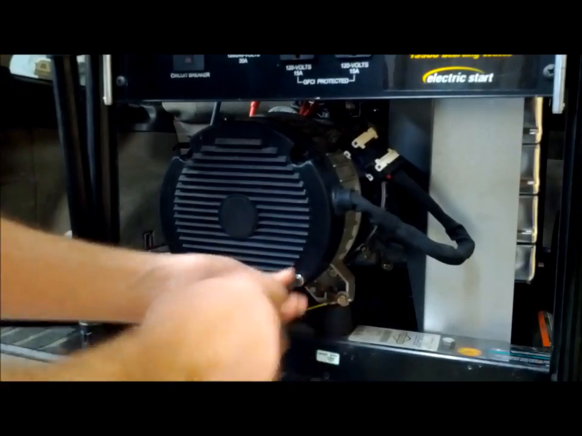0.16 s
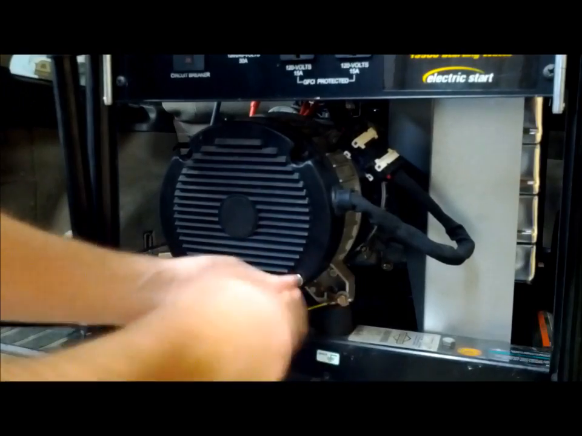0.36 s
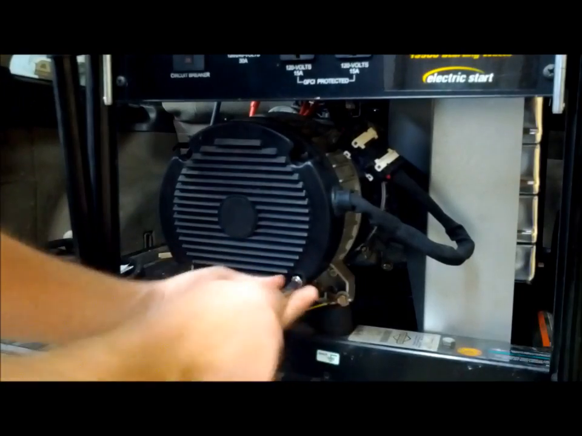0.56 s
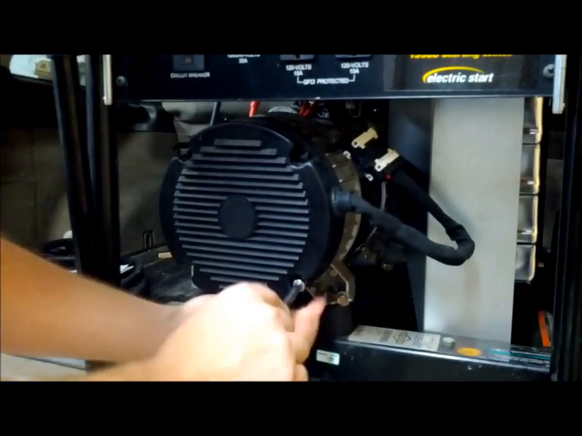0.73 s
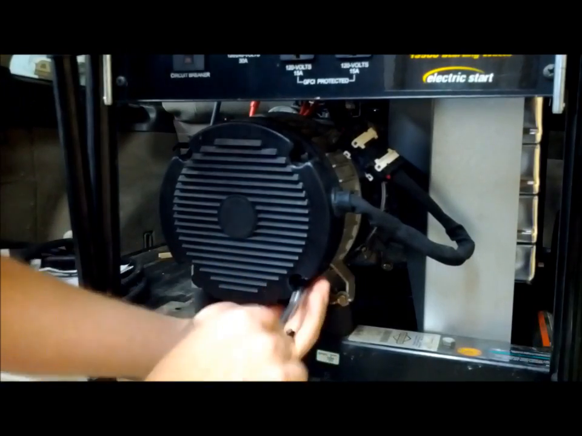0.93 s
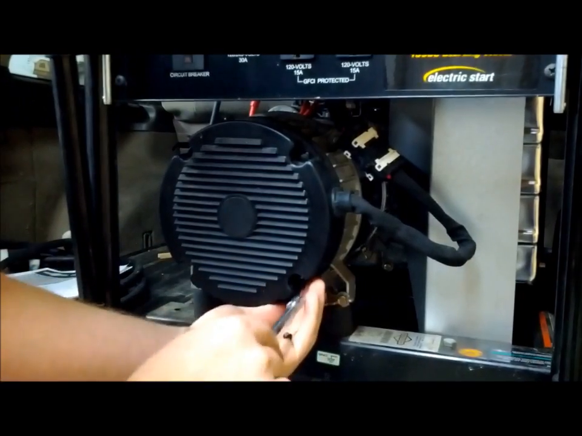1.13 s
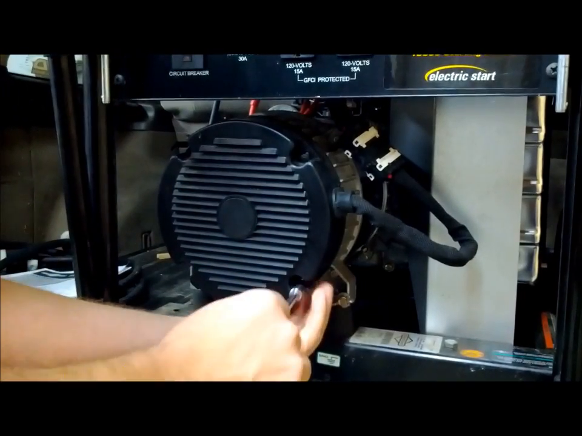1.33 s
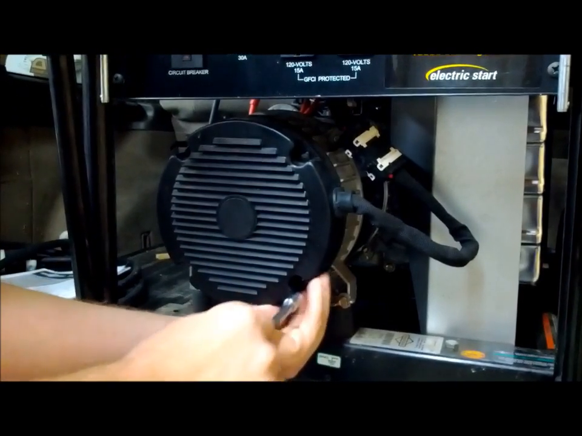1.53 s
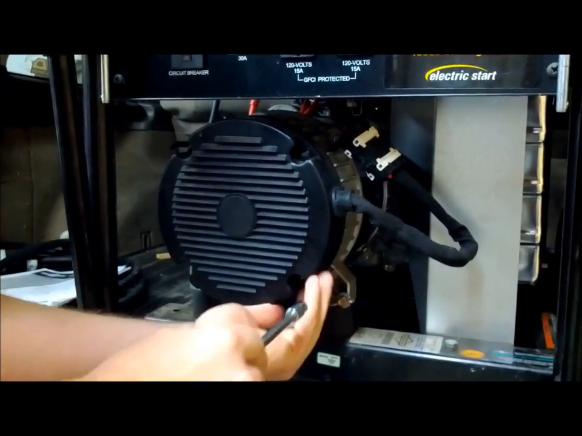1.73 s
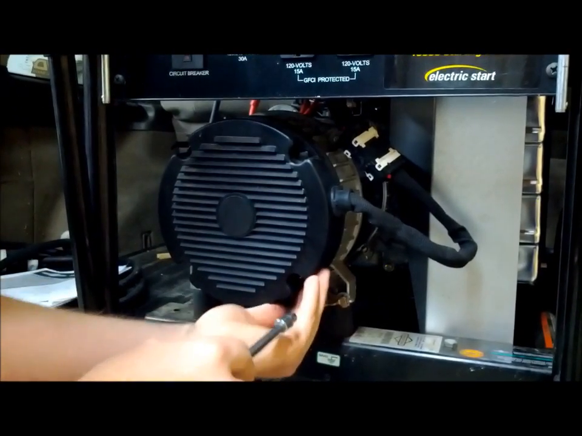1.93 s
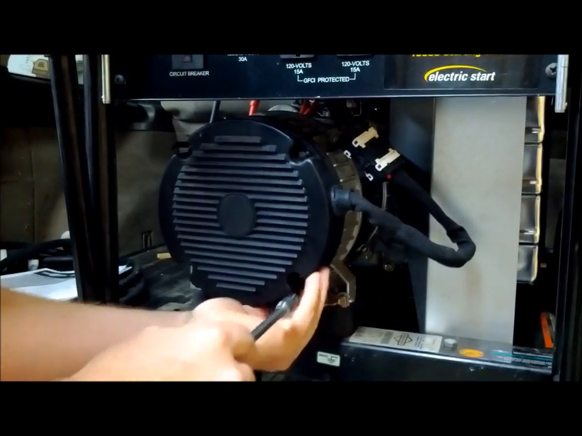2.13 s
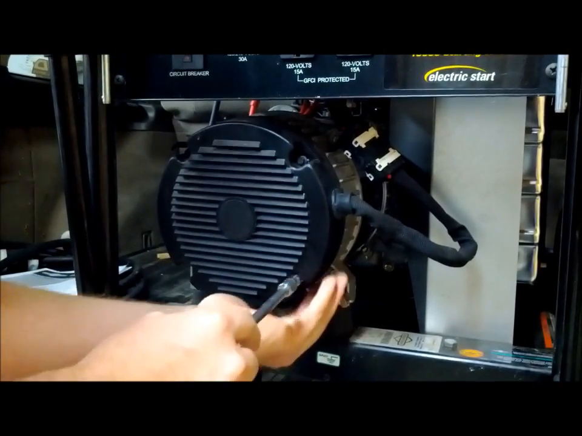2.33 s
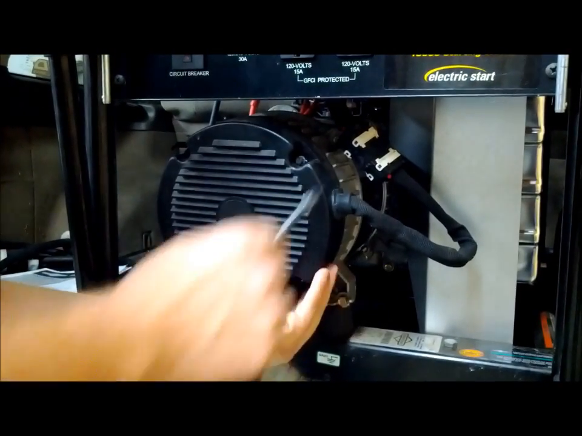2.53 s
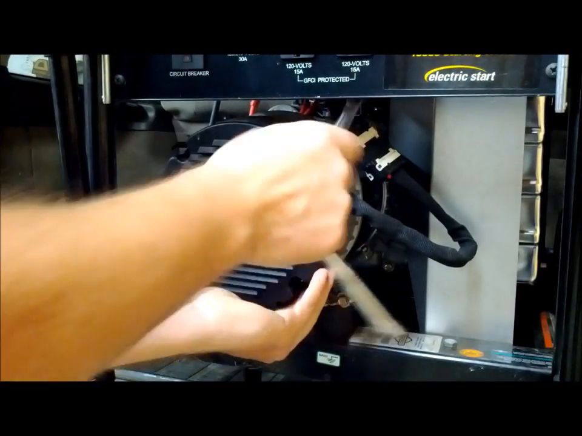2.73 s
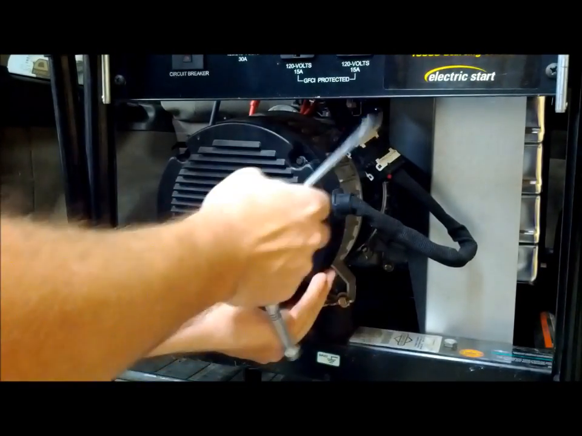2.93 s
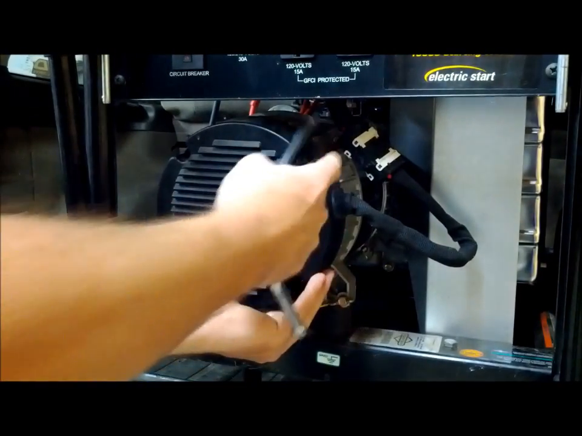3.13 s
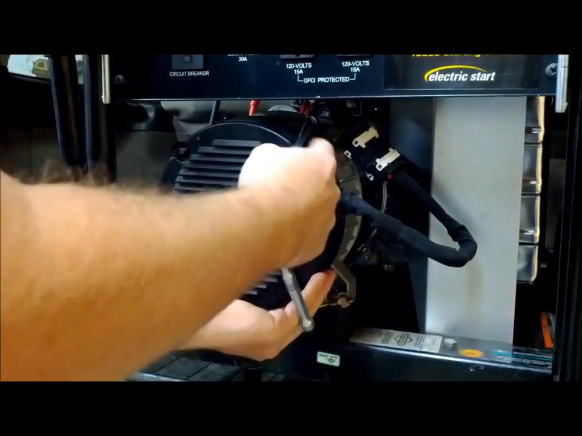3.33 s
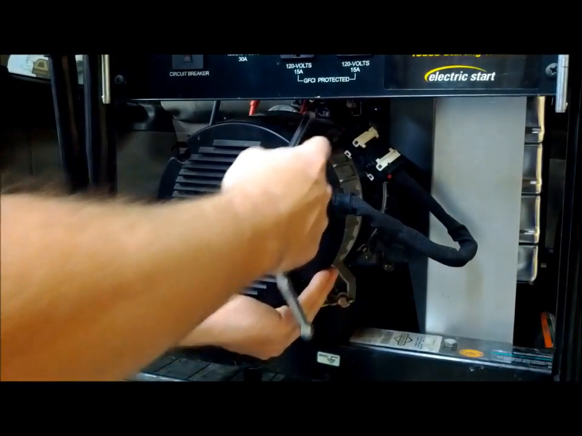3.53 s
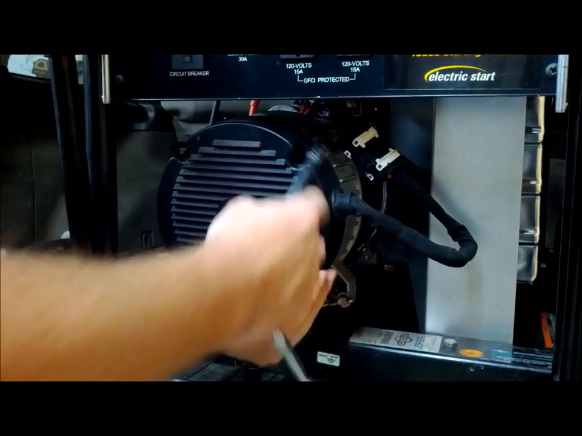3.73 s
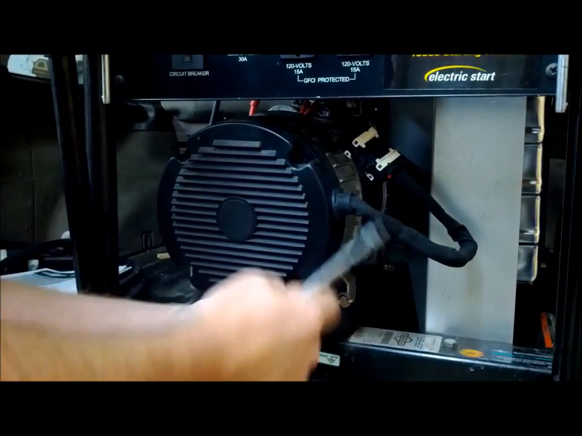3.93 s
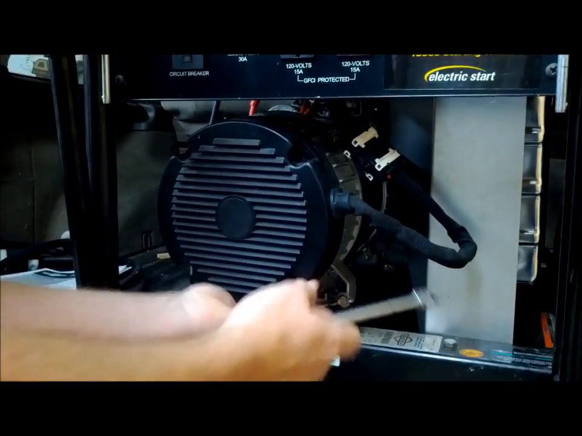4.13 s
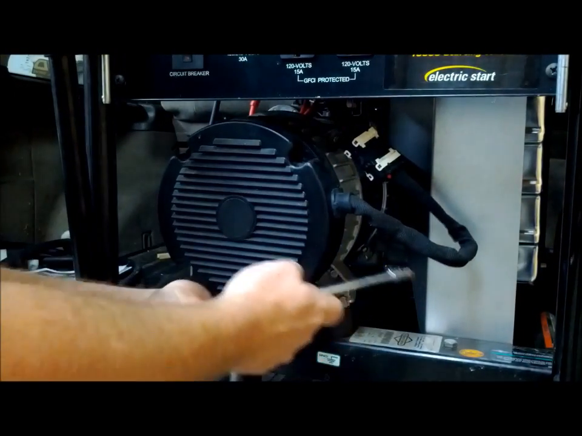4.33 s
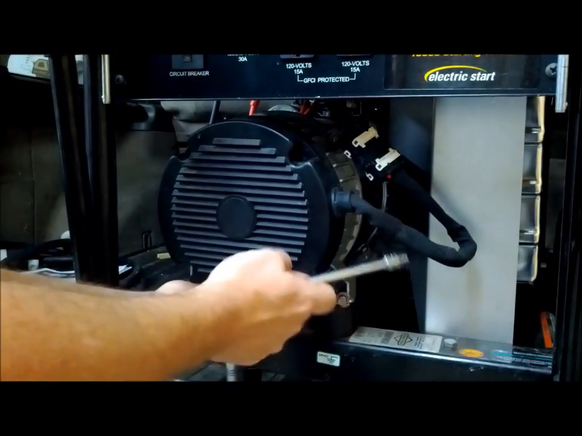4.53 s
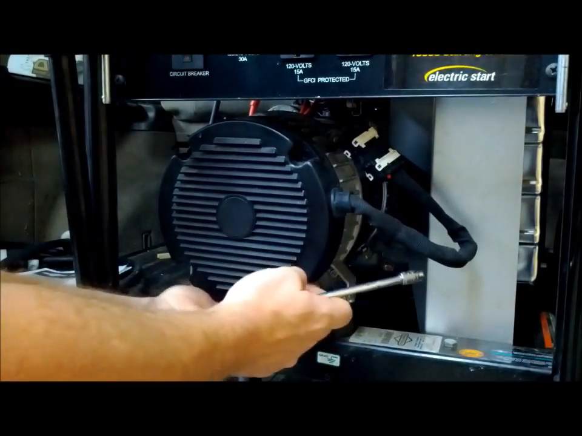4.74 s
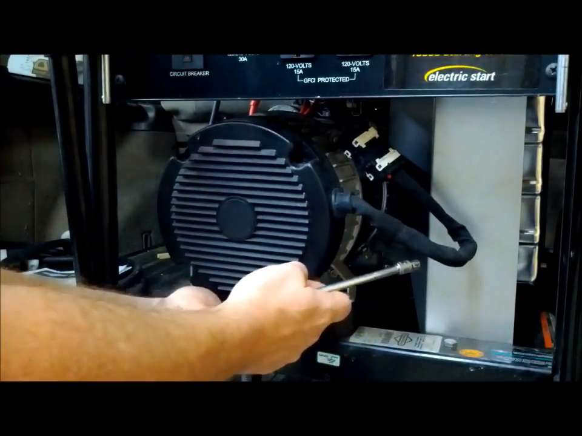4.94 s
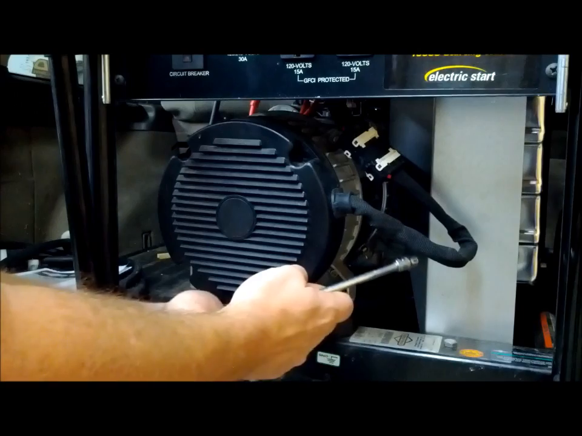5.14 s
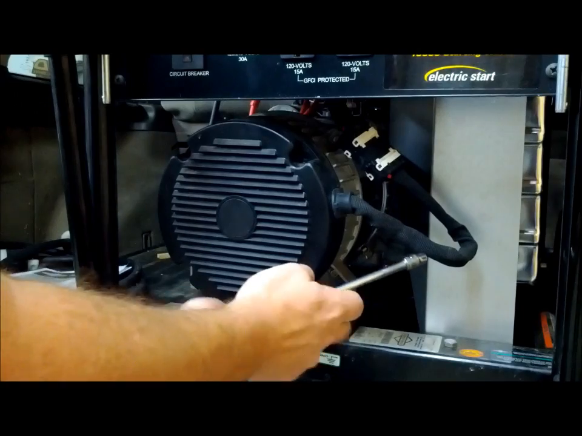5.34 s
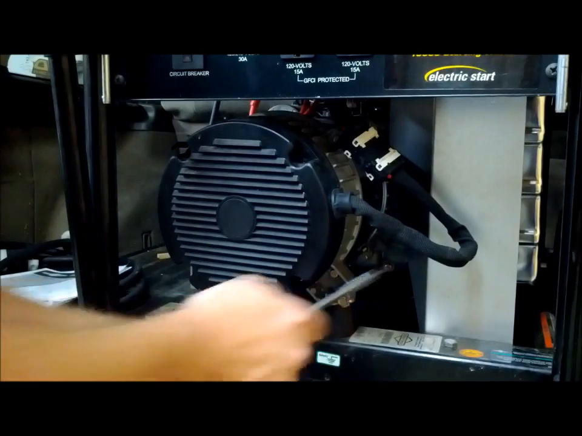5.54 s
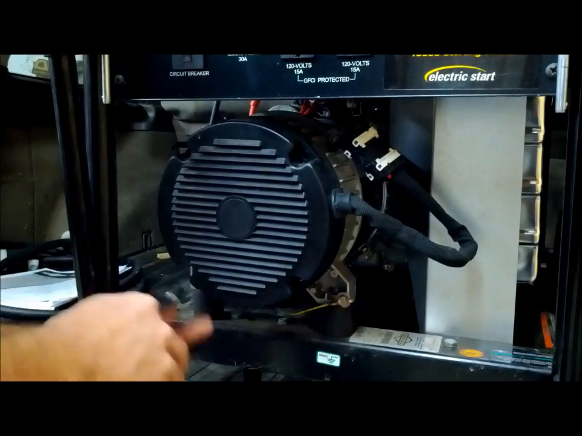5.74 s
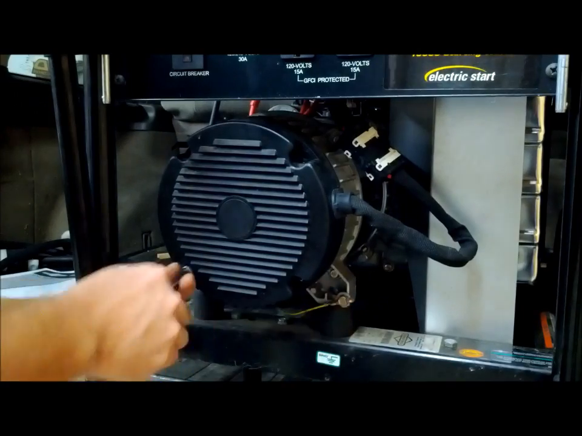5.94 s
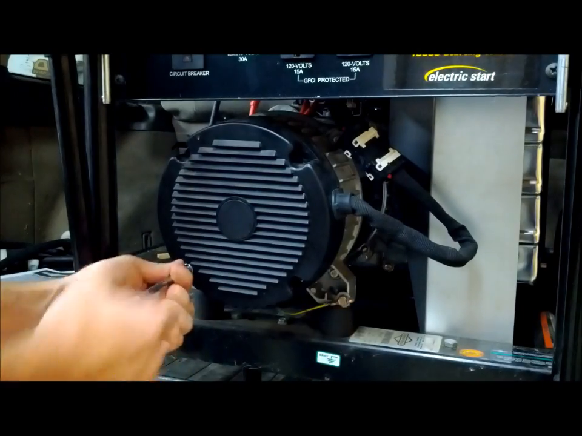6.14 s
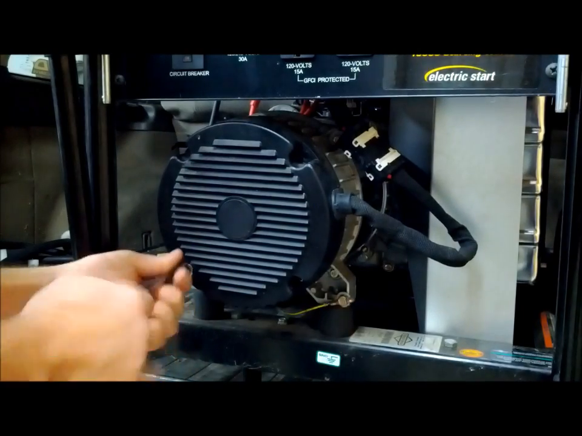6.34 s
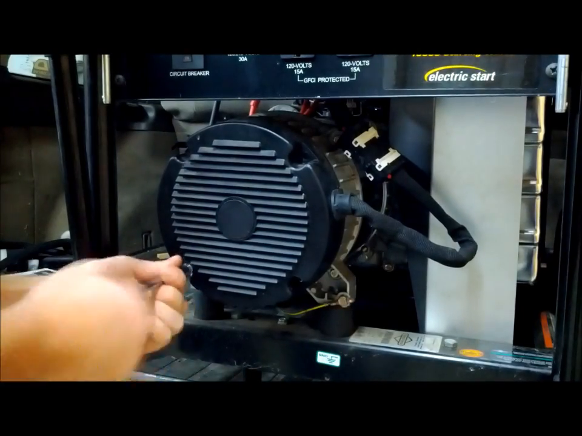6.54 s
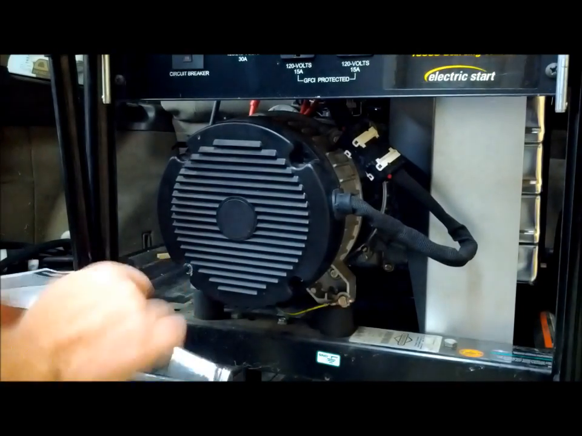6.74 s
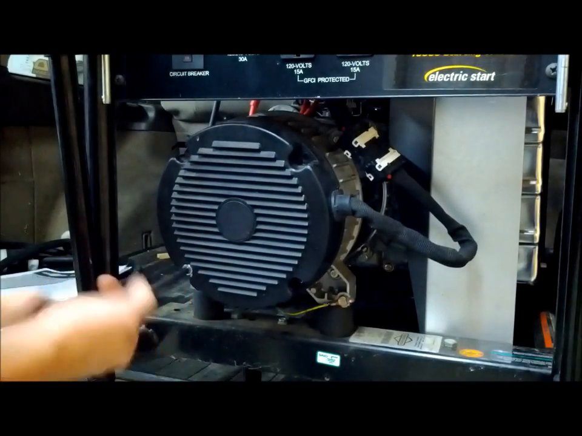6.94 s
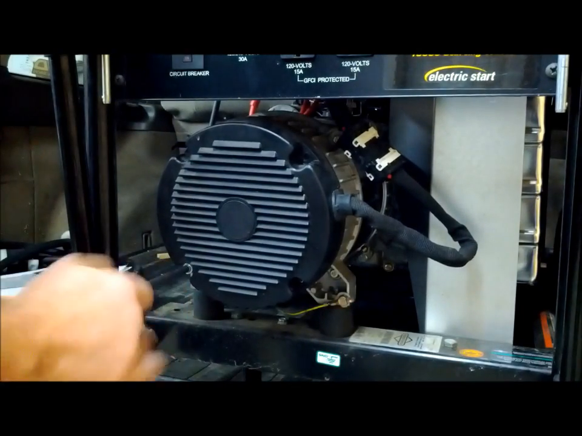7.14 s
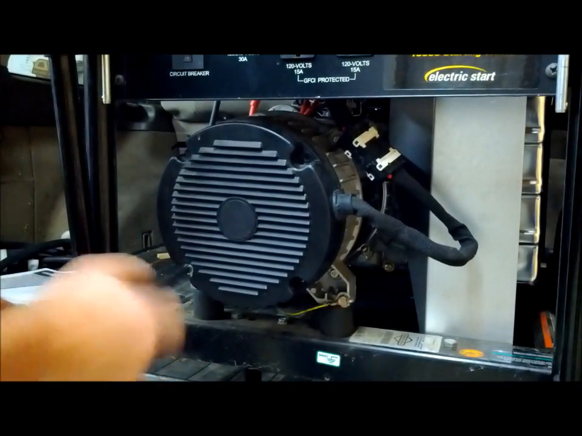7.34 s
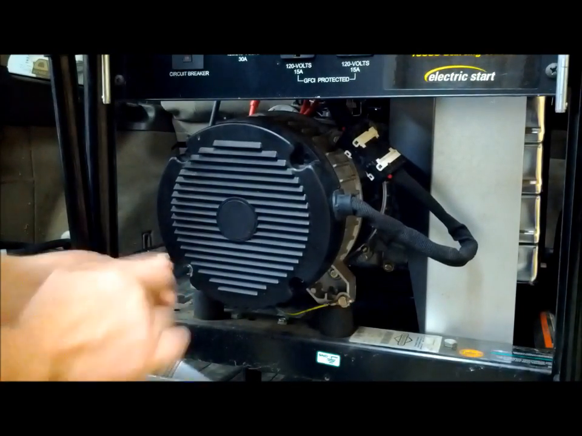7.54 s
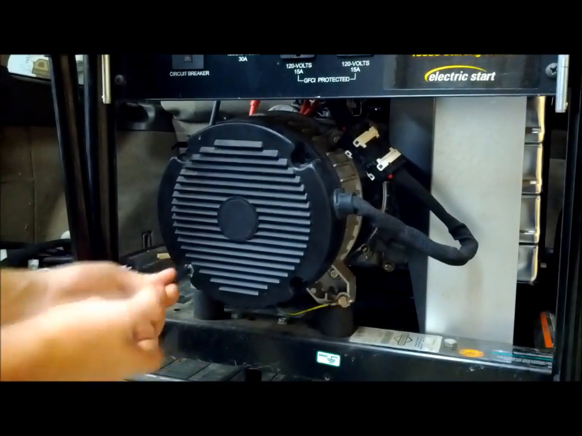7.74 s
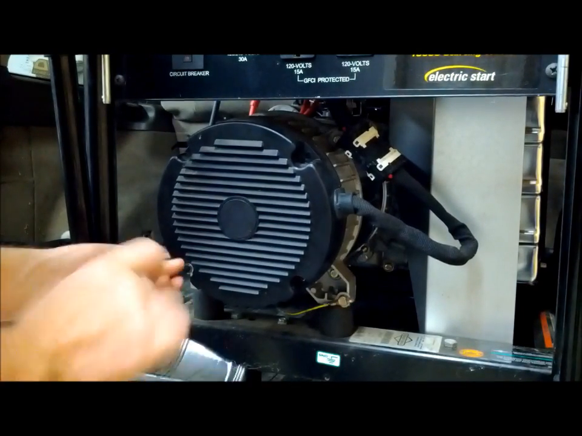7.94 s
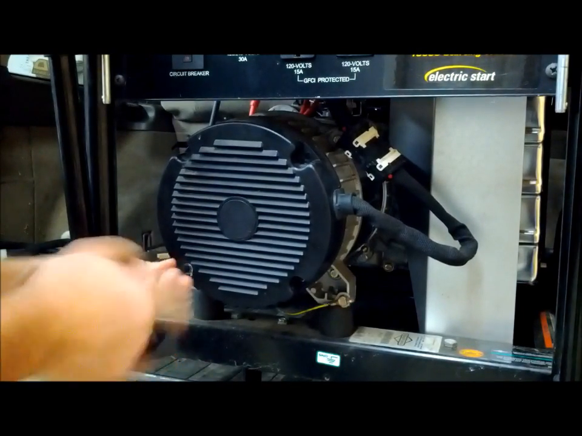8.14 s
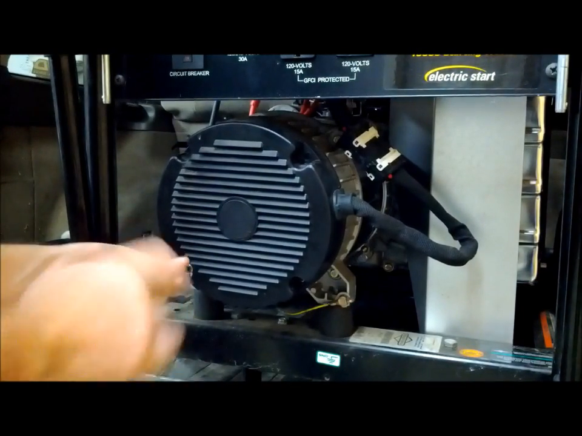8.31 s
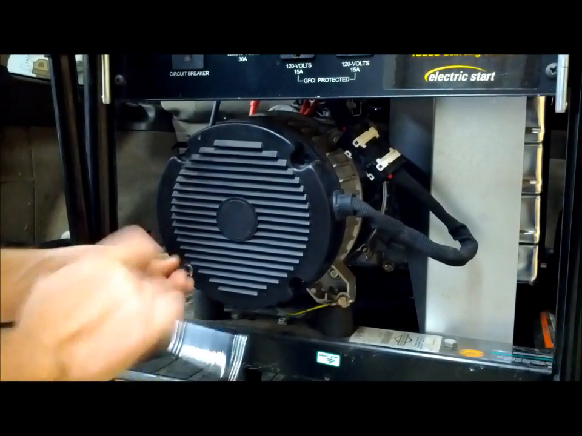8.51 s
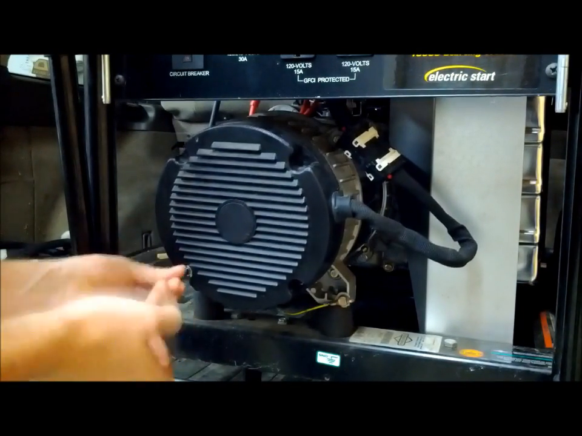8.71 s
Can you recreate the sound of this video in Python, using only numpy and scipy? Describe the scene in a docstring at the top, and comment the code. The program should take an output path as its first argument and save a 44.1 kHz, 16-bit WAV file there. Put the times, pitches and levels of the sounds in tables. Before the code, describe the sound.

A close, dry view of a steel hand tool in a quiet garage with low airy hum and a short diffuse tail. At 0 s a tiny bright click burst, then a fast ratchet run at 0.3-0.45 s. From 0.6 to 2.3 s small faint metal taps, with brighter ticks near 1.8 and 2.1 s and grainy skin rubs. At 2.75 s a loud hard double clank rings the metal frame with a low boom; another knock at 3.15 s, a short rub and clack around 3.4 s, a knock at 3.7 s. From 4.3 to 5.3 s woody-metallic clacks, strongest near 4.95 s. Sharp snap at 5.8 s, rattle at 5.9 s, single clicks at 6.1-6.2 s. Ratchet bursts at 6.5 and 6.9 s; a dull object bounces at 7.1-7.25 s; slower clicks at 7.3-7.4 s, then rapid bright runs at 7.6, 7.95, 8.3 and 8.6 s, with slight knocks between.

```python
"""Steel ratchet in a garage

A steel ratchet is handled close by: extension and socket knock as broadband contact noise and short notes,
skin rubs as granular friction noise, and a part set down on the floor bounces as damped modes.
The pawl skips over the gear teeth in quick runs, and each drop excites the modes of gear, head and pawl.
Hard walls add a short diffuse tail over a quiet hum of air."""
import sys
import numpy as np
from scipy import signal
from scipy.fft import rfft, irfft
from scipy.io import wavfile

SR = 44100
rng = np.random.default_rng(int(sys.argv[2]) if len(sys.argv) > 2 else 0)


def transcribe(signal):
    """Save signal, clipped to [-1, 1], as a 16-bit WAV file at the path in sys.argv[1]."""
    frames = np.atleast_2d(signal).T
    limited = np.clip(frames, -1, 1)
    pcm = np.round(limited * 32767).astype(np.int16)
    wavfile.write(sys.argv[1], SR, pcm)


N = 386757  # samples in the scene

# contact noise of hand-held parts, one row each for thud, clack, tick and sparkle;
# the two times are 1/e decays: low_hz, high_hz, crack_s, rattle_s
HELD_RANGES = [(188, 1300, 0.0025, 0.02), (1245, 3610, 0.0009, 0.0083), (4350, 12000, 0.00062, 0.0056),
               (7800, 13200, 0.00059, 0.0051)]


def undb(db):
    """Decibel definition: a level becomes an amplitude ratio."""
    return 10 ** (np.asarray(db) / 20)


def band(x, lo_hz, hi_hz, order=3):
    """Linear filtering: a Butterworth band-pass."""
    return signal.sosfilt(signal.butter(order, [lo_hz, min(hi_hz, .45 * SR)], "band", fs=SR, output="sos"), x)


def place(times, grains):
    """Superposition: one row of samples is added at each time."""
    out = np.zeros(N + grains.shape[1])
    for at, grain in zip((np.asarray(times) * SR).astype(int), grains):
        out[at:at + len(grain)] += grain
    return out[:N]


def ring(times, blow_db, modes, rise_s, detune, drift_cycles2_per_s, free=1, loose=1):
    """Modal synthesis: each blow excites damped sines of uneven strength, phase and tuning."""
    palm_from_s, palm_to_s, palm_t60_s = 2, 5.5, 0.093  # the palm on the head damps modes above 4 kHz
    covered = ((times > palm_from_s) & (times < palm_to_s))[:, None]
    out = 0
    for hz, t60, db in modes:
        t = np.arange(int(min(t60, 1) * SR)) / SR
        size, shift, turn = rng.standard_normal((len(times), 3)).T[:, :, None]
        # loose joints let the phase wander, which roughens the long rings
        steps = rng.standard_normal(SR)
        wander = np.cumsum(steps)[:len(t)] * np.sqrt(drift_cycles2_per_s / SR)
        # the grip detunes the well-damped modes most
        tuned_hz = hz * (1 + detune * shift / (1 + t60 / 0.01))
        wave = np.sin(2 * np.pi * (tuned_hz * t + loose * turn + wander))
        # only modes shorter than 0.1 s are cut short by the next blow
        open_t60 = t60 * (free if t60 < .1 else 1)
        decay = 1000 ** (-t / np.where(covered & (hz > 4000), min(t60, palm_t60_s), open_t60))
        onset = (1 - np.exp(-t / rise_s)) ** 2
        strength = undb(blow_db[:, None] + db + 2.3 * size)
        out = out + place(times, strength * onset * decay * wave)
    return out


def chatter(times, db, lo_hz, hi_hz, fall_s, after_s, after_db, rise_s):
    """Rough contact: band noise under a quick crack and a fainter rattle while the parts settle."""
    t = np.arange(SR // 10) / SR
    decay = np.exp(-t / fall_s) + undb(after_db) * np.exp(-t / after_s)
    shape = (1 - np.exp(-t / rise_s)) * decay
    noise = band(rng.standard_normal(N), lo_hz, hi_hz)
    level = place(times, undb(db)[:, None] * shape / shape.max(axis=-1, keepdims=True))
    return band(level * noise / noise.std(), lo_hz, hi_hz, order=1)


def air():
    """Stationary noise: room air and microphone hiss take a fixed spectrum and swell a little."""
    # spectrum of the air, relative amplitude: frequency_hz, level_db
    spectrum = [(12, -37), (20, -0.5), (81, -6.5), (119, -5.5), (162, -12.5), (344, -19.5), (568, -24),
                (653, -22), (751, -23.5), (817, -32), (1050, -28), (5290, -34), (7390, -28.5), (15700, -30)]
    mean_db = -57.5
    hz, db = np.transpose(spectrum)
    shape = undb(np.interp(np.log(np.fft.rfftfreq(N, 1 / SR) + 1), np.log(hz), db))
    hiss = irfft(rfft(rng.standard_normal(N)) * shape, N)
    swell = np.interp(np.arange(N), np.linspace(0, N, 30), rng.standard_normal(30))
    return hiss / hiss.std() * undb(mean_db + 1.2 * swell)


def garage(x):
    """Diffuse reverberation: dense reflections build up over milliseconds, then decay band by band."""
    # decay of the reflections, level relative: centre_hz, t60_s, level_db
    room_bands = [(239, 0.33, -29.5), (500, 0.68, -25), (987, 0.5, -22.5), (1890, 0.6, -23),
                  (3260, 0.62, -18), (5400, 0.4, -11.5), (9500, 0.2, -7.5), (14200, 0.27, -10)]
    t, tail = np.arange(SR) / SR, 0
    for hz, t60, db in room_bands:
        noise = band(rng.standard_normal(SR), hz / 1.6, hz * 1.5, order=2)
        part = noise * 1000 ** (-t / t60) * (1 - np.exp(-t / 0.0061))
        # unit energy, then weighted by the inverse root of the band's width
        tail = tail + undb(db) * part / np.linalg.norm(part) / np.sqrt(1.46 * hz / SR)
    return signal.oaconvolve(x, tail)[:N]


def rub():
    """Granular friction: skin slips in uneven grains, dull from the palm and bright from the knurling."""
    # fingers slide over the tool; the last row is the faint bright hiss after a landing:
    # start_s, firmest_s, end_s, dull_db, bright_db
    strokes = [(0.15, 0.2, 0.29, -59.5, -69.5), (0.535, 0.714, 0.95, -68.5, -73),
               (1.58, 1.595, 1.64, -59.5, -63), (1.643, 1.67, 1.68, -55.5, -50.5),
               (1.754, 1.774, 1.93, -48.5, -53), (1.991, 2.104, 2.18, -51, -55.5),
               (2.234, 2.26, 2.27, -48, -42), (3.391, 3.46, 3.45, -39, -41),
               (4.06, 4.184, 4.25, -61.5, -55), (4.283, 4.355, 4.43, -56, -57),
               (6.217, 6.233, 6.4, -57, -51), (6.707, 6.81, 7.3, -63, -63), (7.105, 7.113, 25, -75, -73)]
    ease_db = -12  # level at both ends of a row, relative to its firmest moment
    # loose parts rattle along: mean rate, level over the rub and its standard deviation
    rattle_per_s, rattle_db, rattle_scatter_db = 370, -0.5, 4.5
    t, dull, bright = np.arange(N) / SR, 0, 0
    for start, firm, end, dull_db, bright_db in strokes:
        fade = np.clip(np.minimum(t - start, end - t) / 0.015, 0, 1)
        touch = fade * undb(np.interp(t, [start, firm, end], [ease_db, 0, ease_db]))
        dull = dull + undb(dull_db) * touch
        bright = bright + undb(bright_db) * touch
    # a new slip strength every 128 samples
    slips = rng.exponential(size=N // 128 + 1).clip(0, 3)
    grain = undb(4 * np.repeat(slips, 128)[:N])
    noise = [band(grain * rng.standard_normal(N), lo, hi) for lo, hi in ((650, 3400), (5500, 18000))]
    out = sum(level * n / n.std() for level, n in zip((dull, bright), noise))
    # Poisson arrivals of the rattle
    s = np.cumsum(rng.exponential(size=4000)) / rattle_per_s
    inside = s < t[-1]
    chance = rng.standard_normal((4000, 2))[inside].T
    at = (s[inside] * SR).astype(int)
    # the dull rub drives the clack range, the bright rub the tick range
    for level, part, size in zip((dull, bright), HELD_RANGES[1:], chance):
        db = 20 * np.log10(level[at] + 1e-9) + rattle_db + rattle_scatter_db * size
        out = out + chatter(at / SR, db, *part, after_db=-25.5, rise_s=0.00021)
    return out


def bounce():
    """Repeated impact: low modes start nearly in phase, so each dull knock has a firm front."""
    # something set down on the floor bounces: time_s, level_db
    landings = [(7.0942, -28.5), (7.1166, -31.5), (7.133, -34), (7.166, -39), (7.205, -46), (7.233, -47),
                (7.255, -44.5)]
    # modes it rings with, level relative: frequency_hz, t60_s, level_db
    block_modes = [(218.5, 0.19, -8.5), (400, 0.052, -8), (502, 0.07, -10.5), (692, 0.049, -3.5),
                   (930, 0.053, -1), (1305, 0.051, -6), (1740, 0.033, -9), (2410, 0.024, -16)]
    body = ring(*np.transpose(landings), block_modes, rise_s=0.0001, detune=0.045,
                drift_cycles2_per_s=60.0 / (2 * np.pi), loose=0.13)
    return band(body, 167, 7900, order=2)


def clack(times, db, hz):
    """Phase diffusion: a short note roughened by a random walk of phase, with its own pitch for each knock."""
    decay_s, linewidth_hz = 0.0013, 870
    t = np.arange(SR // 25) / SR
    steps = rng.standard_normal((len(times), len(t)))
    wander = np.cumsum(steps, axis=1) * np.sqrt(2 * np.pi * linewidth_hz / SR)
    decay = np.exp(-t / decay_s) + undb(-12) * np.exp(-t / 0.016)
    shape = (1 - np.exp(-t / 0.00022)) * decay
    return place(times, undb(db)[:, None] * shape * np.sin(2 * np.pi * hz[:, None] * t + wander))


def knocks():
    """Damped impact: hand-held parts barely ring and mostly give contact noise; cover and frame boom along."""
    # extension, socket and screws knock together, levels relative:
    # time_s, thud_db, clack_db, clack_hz, tick_db, sparkle_db
    contacts = [(0.047, -48.5, -39.5, 1200, -56, -33), (0.284, -47, -46, 3280, -45, -37),
                (0.602, -51.5, -50.5, 1710, -54, -56), (0.769, -70.5, -50.5, 1910, -46.5, -49.5),
                (0.793, -48, -45.5, 1450, -64, -67), (0.9958, -54, -42.5, 1650, -63, -63),
                (1.03, -61, -47, 4300, -45, -39), (1.044, -61.5, -36, 1675, -44, -57),
                (1.193, -57.5, -40.5, 1750, -57.5, -65), (1.2591, -68, -39.5, 1624, -49, -44),
                (1.278, -52.5, -41.5, 2570, -44.5, -44), (1.3633, -70, -48.5, 1730, -45.5, -36.5),
                (1.773, -58.5, -44, 2260, -56, -58), (1.7885, -44, -40, 1580, -63, -44),
                (1.8284, -46, -37, 3820, -24.5, -24.5), (1.899, -51.5, -55, 1200, -46, -39),
                (2.025, -72, -51, 3500, -56, -55), (2.0529, -51, -44, 3670, -42, -39),
                (2.058, -50, -40.5, 1760, -64, -55), (2.074, -43, -51, 1223, -71, -68),
                (2.096, -65, -32, 3950, -31, -26), (2.113, -50, -44, 1210, -64, -57),
                (2.132, -50, -33.5, 1820, -66, -61), (2.158, -72, -55, 2270, -58, -67),
                (2.247, -55.5, -33.5, 1540, -49, -58), (2.26, -73, -34.5, 1450, -43, -58),
                (2.732, -68, -50.5, 2620, -39.5, -32), (2.7505, -23.5, -19, 1660, -26.5, -19),
                (2.811, -38.5, -22.5, 3380, -18, -21), (3.0456, -75, -48, 2630, -40.5, -34),
                (3.1028, -73, -47, 2320, -40, -44), (3.1407, -32, -19.5, 1776, -32.5, -34),
                (3.395, -69, -44, 1860, -59, -54), (3.412, -61, -29.5, 2504, -26.5, -33),
                (3.422, -64.5, -29.5, 1840, -57, -52), (3.452, -78, -35.5, 1760, -34.5, -59),
                (3.694, -35, -25.5, 1583, -40, -43), (4.061, -60, -43.5, 2000, -67, -62),
                (4.3095, -61, -41.5, 2940, -59, -71), (4.3329, -37.5, -33.5, 1595, -39, -48),
                (4.363, -68, -51, 2300, -63, -54), (4.381, -73, -37.5, 1795, -50, -55),
                (4.3973, -50, -31, 1850, -33, -33.5), (4.5151, -68, -33.5, 3040, -47, -50),
                (4.6374, -53, -34, 2910, -55.5, -48.5), (4.6752, -49.5, -30.5, 2106, -69, -61),
                (4.6903, -58, -42, 1620, -70, -65), (4.799, -52.5, -42.5, 2060, -68, -60),
                (4.834, -46, -35.5, 1665, -51, -60), (4.84, -51, -38, 1610, -46, -53),
                (4.932, -53, -21, 2415, -25, -45), (4.9599, -54, -23.5, 3860, -28.5, -36),
                (5.0066, -54, -33.5, 1650, -37.5, -42), (5.0242, -65, -39, 3070, -57, -60),
                (5.0507, -53, -36, 1667, -67, -62), (5.083, -72.5, -39, 2410, -59, -60),
                (5.1948, -59, -31.5, 2776, -51, -47.5), (5.2846, -58, -29.5, 2960, -27.5, -30),
                (5.417, -77, -63, 1850, -45.5, -32), (5.52, -75.5, -64.5, 4030, -43, -38),
                (5.53, -90, -68.5, 3820, -44, -34), (5.8466, -41, -18, 3465, -22.5, -16),
                (5.9036, -46, -31, 3050, -20.5, -34), (5.9194, -53, -28, 3060, -23, -33),
                (5.9232, -37.5, -26.5, 2565, -41, -32), (6.154, -46, -32.5, 1222, -32.5, -30),
                (6.1601, -54, -40, 2620, -37, -47), (6.3, -60, -42.5, 2500, -50, -45),
                (6.318, -61, -39, 1204, -36, -36.5), (6.6226, -50, -39, 2470, -31.5, -34),
                (6.799, -54, -44.5, 1220, -46.5, -61), (6.848, -55, -56, 2480, -60, -59),
                (7.003, -61, -50, 3700, -43, -33.5), (7.1147, -61, -50, 1290, -62, -33),
                (7.119, -60, -57, 1390, -62, -31), (7.221, -53, -90, 1320, -63, -52),
                (7.267, -45, -52, 1220, -45, -52), (7.278, -53, -42, 2620, -31, -50),
                (7.5179, -49, -47, 1720, -42, -54), (7.5914, -58, -52, 4350, -33.5, -31),
                (7.6026, -51, -41.5, 1230, -37, -47), (7.881, -52.5, -49, 1190, -68, -60),
                (8.2606, -63, -38, 3080, -34, -49), (8.421, -60, -47, 2410, -38, -28),
                (8.478, -51.5, -57, 3500, -64, -52), (8.5708, -54.5, -50, 1270, -51, -56)]
    # the metal cover booms with each thud, level relative: frequency_hz, t60_s, level_db
    cover_modes = [(395, 0.019, -2.5), (662.6, 0.047, 3), (1057, 0.014, 5.5)]
    # one blow lands on the generator's frame: time_s, level_db
    frame_blow = [(2.7509, -22.5)]
    # modes of that frame, level relative: frequency_hz, t60_s, level_db
    frame_modes = [(94, 0.53, -16), (176.6, 1.4, -26), (263, 0.06, -11), (385, 0.06, -0.5),
                   (480, 0.34, -13.5), (676, 0.12, -5), (995, 0.062, 1), (1652, .06, -1), (2280, .06, -0.5)]
    # later knocks carry an extra very high sparkle: columns as in HELD_RANGES, level over the sparkle
    high_sparkle_from_s, high_sparkle_range, high_sparkle_db = 5.3, (14000, 15000, .0008, 0.008), -3.5
    splash_db = -1  # noise around the clack's note
    s, thud, clack_db, hz, tick, sparkle = np.transpose(contacts)
    blows = thud, clack_db + splash_db, tick + 3, sparkle + 3
    parts = sum(chatter(s, db, *part, after_db=-4, rise_s=0.00017) for db, part in zip(blows, HELD_RANGES))
    late = s > high_sparkle_from_s
    high_db = sparkle[late] + high_sparkle_db
    parts = parts + chatter(s[late], high_db, *high_sparkle_range, after_db=-6, rise_s=0.0002)
    notes = band(clack(s, clack_db + 5.0, hz), 800, 7700)
    cover = ring(s, thud, cover_modes, rise_s=0.00045, detune=0.15, drift_cycles2_per_s=26.9 / (2 * np.pi))
    frame = ring(*np.transpose(frame_blow), frame_modes, rise_s=0.001, detune=0,
                 drift_cycles2_per_s=39.7 / (2 * np.pi))
    return parts + notes + cover + frame


def teeth():
    """Kinematics of a run: interpolating over the tooth count gives each click its moment and four blows."""
    # one list per run of clicks; the rows near 2.7 and 3.0 s are knocks that ring the head; levels relative:
    # time_s, gear_tick_db, head_ring_db, pawl_ring_db, upper_pawl_ring_db
    runs = [
        [(.0019, -14.5, -2.5, -4, 11), (.0119, -21.5, -15, -56, -19)],
        [(.2875, -20, -4.5, -13, 3), (.3005, -14.5, -12, -12, 9), (.3135, -21, -6, -2.5, 5.5),
         (.3215, -31, -6.5, 7, 5), (.3365, -26, -7.5, -15, 5), (.381, -17.5, -17, -6, 0),
         (.399, -22, -25, 7, -3), (.4105, -15.5, -14, 8.5, -4), (.4203, -35, -8.5, -4.5, -3),
         (.432, -30, -7.5, 8, -7)],
        [(2.7494, -12.5, -7, -22, 0.5), (2.786, -21, -24, -31, -27.5)],
        [(3.0458, -53, -24, -33, -29)],
        [(5.7654, -34, -14.5, 7.5, 9.5)],
        [(6.0621, -23.5, -7, -24, 3)],
        [(6.2016, -26.5, -11, -1, -2), (6.2221, -29, -9, -6, -2)],
        [(6.4899, -16.5, -13.5, 5.5, 6), (6.5023, -23, -8, -4, -8), (6.5112, -17, -17, 1, -1),
         (6.5245, -18, -13, 8, -2.5), (6.5542, -14, -15, 7, 8), (6.5682, -31, -20, 6.5, -9)],
        [(6.8915, -17.5, -17, -1, 5), (6.9065, -12.5, -21, -3, -8), (6.9243, -9.5, -7.5, 4.5, 14.5)],
        [(7.2815, -17, -25, -9, -24), (7.346, -13, -16, -3, -18), (7.3634, -13, -23, -2, -10),
         (7.426, -27.5, -26, -27, -31)],
        [(7.6185, -24, -3.5, -11, -8), (7.631, -23, -8.5, -14, -7), (7.6475, -32, -9.5, -21, 8),
         (7.6725, -15.5, -16, -1, 4), (7.6962, -23.5, -11.5, 2, 1), (7.718, -14.5, -21, -13, -21),
         (7.728, -40, -17.5, 0, 1)],
        [(7.9495, -15, -31, 3, 3), (7.9597, -18, -16, -1, 6), (7.9752, -13.5, -37, 7, 0),
         (8.007, -23, -5, 5.5, -2), (8.0157, -13.5, -10, -18, 8), (8.0432, -15.5, -7.5, 1.5, 4),
         (8.0585, -43, -16, -18, -7)],
        [(8.2665, -19.5, -16, 6, -8), (8.2765, -18, -14, 6, -10), (8.2902, -20, -12, -10, -4),
         (8.3217, -16.5, -12.5, -5, 1), (8.3365, -27, -24, -23, -12), (8.3483, -18, -3.5, -9, 3),
         (8.3615, -27, -2.5, -6, -12)],
        [(8.5915, -16, -12, -13, 9), (8.601, -14, -9, -3, -10), (8.6142, -21, -5, -11, -1),
         (8.64, -22, -13, 2.5, 7), (8.6505, -25, -11, 6, 12), (8.661, -24.5, -20, 3, -12),
         (8.6745, -18, -8.5, 2, -2), (8.6953, -26, -9.5, -8, -5), (8.713, -31, -9, -1, -2)],
    ]
    # steps passed since the run began, at each row of runs: count
    steps_passed = [(0, 2), (0, 1, 3, 5, 8, 16, 20, 22, 23, 24), (0, 1), (0,), (0,), (0,), (0, 1),
                    (0, 1, 2, 4, 8, 9), (0, 1, 2), (0, 1, 2, 3), (0, 1, 3, 7, 11, 14, 15),
                    (0, 1, 3, 8, 10, 14, 16), (0, 1, 3, 9, 12, 14, 16), (0, 1, 3, 9, 12, 14, 16, 18, 19)]
    jitter_s, scatter_db = .0003, 3  # standard deviations: no two teeth are cut alike
    rows = []
    for run, passed in zip(runs, steps_passed):
        for k in range(passed[-1] + 1):
            rows.append([np.interp(k, passed, col) for col in np.transpose(run)])
    uneven = rng.standard_normal((len(rows), 5)) * np.r_[jitter_s, np.full(4, scatter_db)]
    return np.transpose(rows + uneven)


def ratchet():
    """Impact excitation: each blow rings gear, head and pawl, with a crack and a rasp through the handle."""
    # modes of each part, level relative: frequency_hz, t60_s, level_db
    gear_modes = [(1180, 0.03, -20), (2548, 0.02, -15.5), (3352, 0.013, -12.5), (7600, 0.016, -11),
                  (7680, 0.016, -2.5), (8340, 0.02, -2.5)]
    head_modes = [(4960, 0.28, -40), (9240, 0.38, -29.5), (9240, 0.043, -3.5), (9340, 0.0092, 1)]
    # two lists, pawl and upper pawl, level relative: frequency_hz, t60_s, level_db
    pawl_modes = [
        [(13070, .0055, 2), (13200, 0.018, -10), (13200, .14, -32)],
        [(15060, 0.12, -37), (14814, 0.0076, -8), (14900, 0.04, -20)],
    ]
    # grip detuning of gear, head, pawl and upper pawl, in the limit of strong damping: share
    detune_shares = 0.036, 0.024, 0.018, .016
    free_s = 0.0056  # a pawl that meets the next tooth sooner rings shorter in proportion, down to a fifth
    s, gear, head, pawl, upper = teeth()
    s = s.clip(0)
    free = np.clip(np.diff(s, append=N) / free_s, .2, 1)[:, None]
    struck = zip((gear, head, pawl, upper), (gear_modes, head_modes, *pawl_modes), detune_shares)
    steel = sum(ring(s, db, modes, rise_s=0.00078, detune=share, drift_cycles2_per_s=87 / (2 * np.pi), free=free)
                for db, modes, share in struck)
    crack_db = (gear + head + pawl) / 3 - 8
    crack = chatter(s, crack_db, 6500, 16000, 0.0009, 0.0085 * free, after_db=-9, rise_s=0.00024)
    rasp = chatter(s, gear - 25.5, 1200, 6000, 0.00039, 0.015 * free, after_db=-7.5, rise_s=0.00049)
    return band(steel, 450, 20000) + crack + rasp


def scene():
    """Superposition: tool and hands, their reverberation and the air."""
    near = ratchet() + knocks() + bounce() + rub()
    echo = garage(near) * undb(-15.5)
    return (near + echo + air())[None]


def record(dry):
    """Saturation and band-limiting: peaks clip at full scale, then a steep low-pass cuts the top."""
    top_hz = 15750
    low_pass = signal.ellip(10, .2, 65, top_hz, fs=SR, output="sos")
    return signal.sosfilt(low_pass, np.clip(dry, -1, 1))


dry = scene()
out = record(dry)
transcribe(out)
```